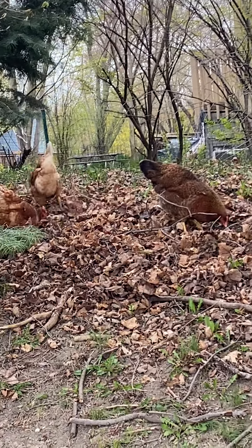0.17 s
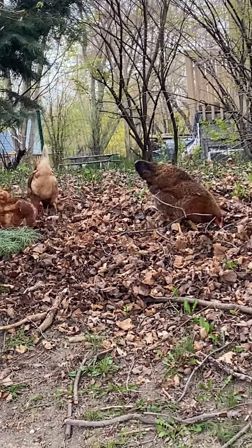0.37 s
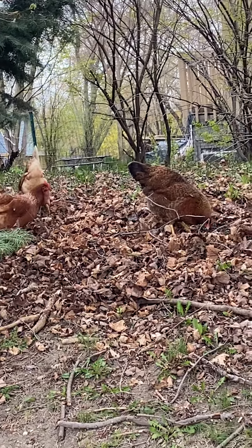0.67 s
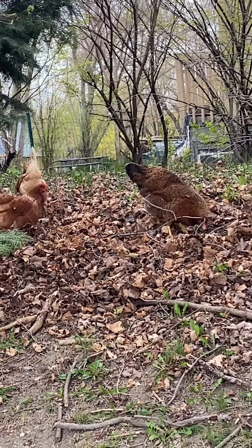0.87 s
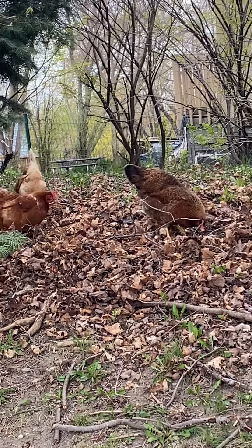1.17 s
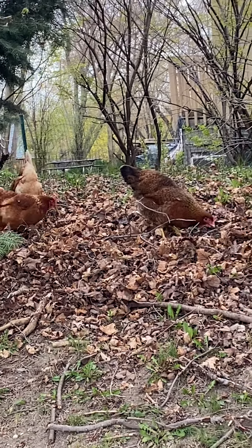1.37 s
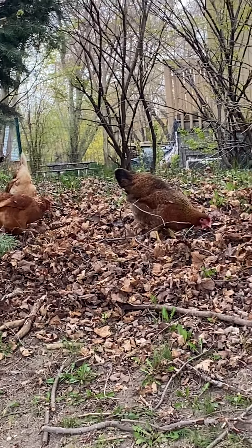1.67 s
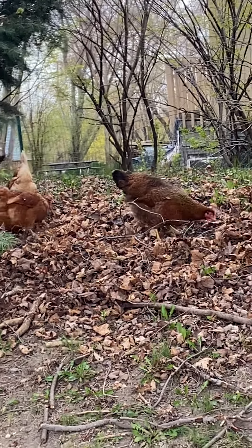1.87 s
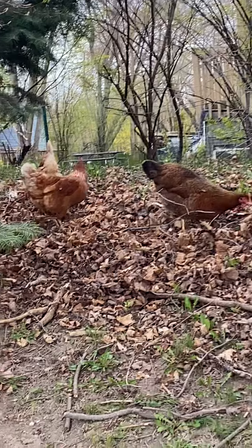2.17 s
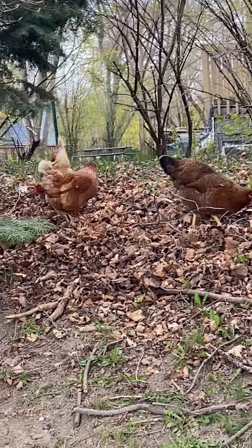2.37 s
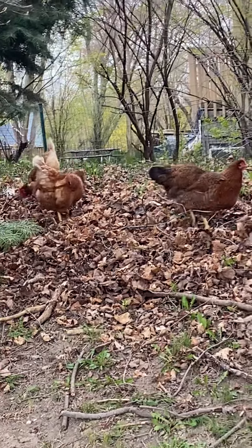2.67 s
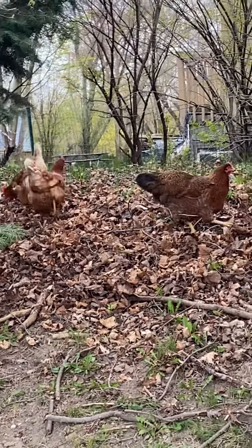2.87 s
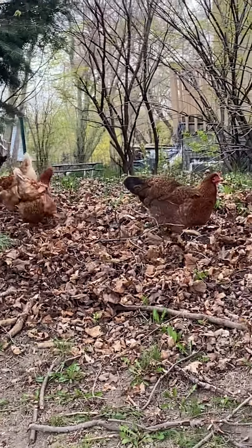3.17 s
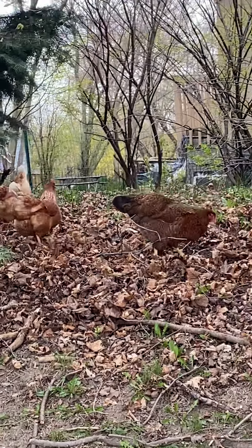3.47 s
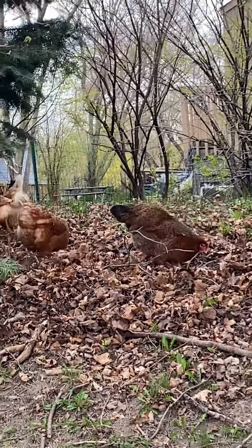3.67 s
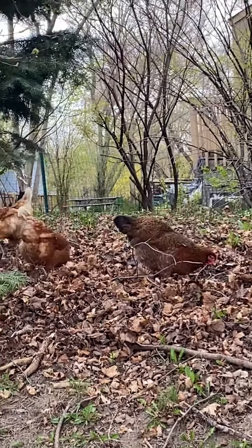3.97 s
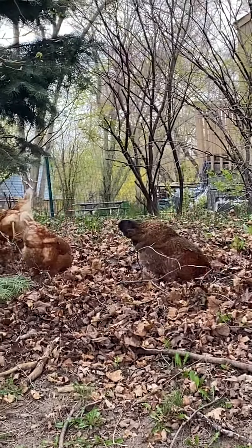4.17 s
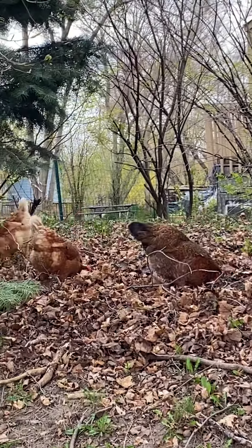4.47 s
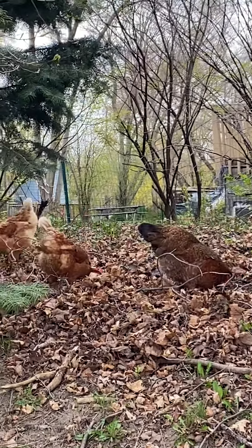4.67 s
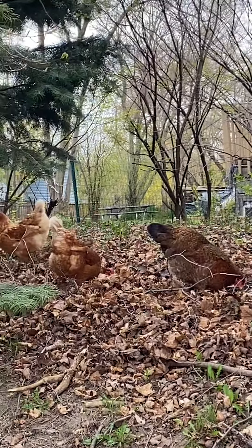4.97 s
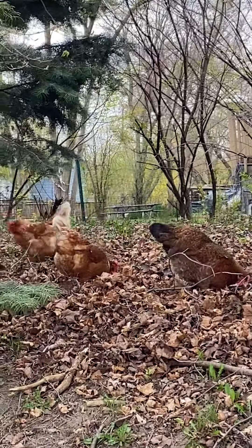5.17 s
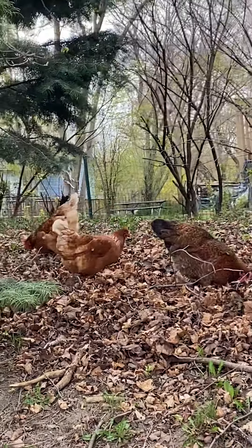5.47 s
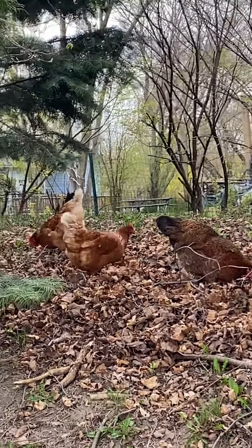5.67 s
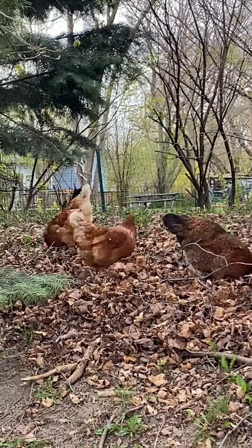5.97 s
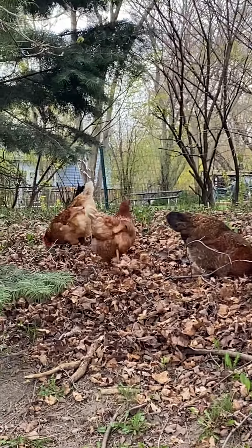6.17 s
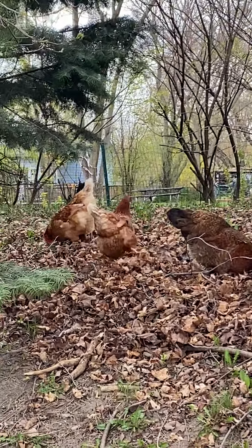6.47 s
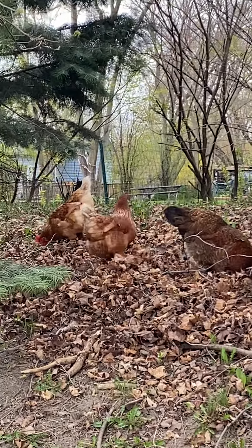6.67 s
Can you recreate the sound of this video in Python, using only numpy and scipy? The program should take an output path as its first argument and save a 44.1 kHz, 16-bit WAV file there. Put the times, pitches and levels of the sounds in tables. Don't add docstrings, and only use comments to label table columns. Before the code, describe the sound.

Brittle leaf litter rustles softly, then crunches under vigorous scratching, while a faraway road drones and a car approaches at the end.

```python
import sys
import numpy as np
from scipy import signal
from scipy.fft import rfft, irfft, next_fast_len
from scipy.io import wavfile
from scipy.ndimage import uniform_filter1d

SR = 44100
rng = np.random.default_rng(int(sys.argv[2]) if len(sys.argv) > 2 else 0)


def put_to_file(sound):
    columns = np.atleast_2d(sound).T
    safe = np.clip(columns, -1, 1)
    whole_steps = np.round(safe * 32767)
    wavfile.write(sys.argv[1], SR, whole_steps.astype(np.int16))


def volts_from_decibels(level):
    exponent = np.asarray(level, float) / 20
    return 10 ** exponent


N = 300982

# t/s, engine drone level/dB
LORRY_DRONE = [(0.0, -58.5), (0.42, -64.5), (0.62, -58), (1.19, -60.5), (2.39, -53.5), (2.62, -62),
               (4.65, -52), (5.28, -46), (5.58, -56), (6.0, -50.5), (6.08, -56), (6.51, -52.5), (6.67, -57),
               (6.82, -53.5)]
# t/s, level/dB
CAR_APPROACH = [
    (5.4, -69),
    (5.8, -64.5),
    (6.1, -59.5),
    (6.35, -55),
    (6.6, -55),
    (6.82, -52.5),
]


def evened(x):
    return x / np.sqrt(np.mean(x ** 2) + 1e-20)


def smooth(x, *widths, axis=-1):
    for width in widths:
        x = uniform_filter1d(x, size=width, axis=axis)
    return x


def read(points, hz):
    f, value = np.transpose(points)
    return np.interp(np.log(hz + 1), np.log(f + 1), value)


def level_curve(points):
    s, db = np.transpose(points)
    return np.interp(np.arange(N) / SR, s, db)


def coloured(x, points):
    size = next_fast_len(N)
    gain = volts_from_decibels(read(points, np.fft.rfftfreq(size, 1 / SR)))
    return irfft(rfft(x, size) * gain, size)[..., :N]


def crack(hz, t60):
    t = np.arange(900) / SR
    return np.sin(2 * np.pi * hz * t) * volts_from_decibels(-60 * t / t60) * (1 - np.exp(-t / .0001))


def strokes():
    # peak t/s, rise/s, fall/s, level/dB, crisp top re level/dB
    shuffles = [(0.0, 0.3, 0.4, -64, -4.5), (0.159, 0.099, 0.14, -57, -3.5),
                (0.379, 0.056, 0.063, -65.5, -6), (0.519, 0.29, 0.082, -69.5, -15),
                (0.686, 0.1, 0.028, -66.5, -6.5), (0.74, 0.024, 0.035, -63, -9.5),
                (0.868, 0.15, 0.069, -68.0, -7.5), (1.09, 0.3, 0.388, -73, -16),
                (1.249, 0.062, 0.074, -66.5, -9.5), (1.426, 0.081, 0.047, -66, -16),
                (1.518, 0.09, 0.13, -63.5, -10), (1.685, 0.05, 0.099, -62, -7),
                (1.838, 0.3, 0.022, -70.5, -8.5), (1.893, 0.13, 0.16, -65, -7.0),
                (2.166, 0.079, 0.351, -63.5, -4.5), (2.472, 0.16, 0.038, -62.5, -7.5),
                (2.639, 0.19, 0.13, -69.5, -11.5), (5.66, 0.28, 0.14, -67, -4),
                (5.69, 0.088, 0.31, -69, -8), (5.933, 0.121, 0.4, -68.5, -11),
                (6.179, 0.075, 0.29, -60.5, -11.5), (6.32, 0.011, 0.4, -63, -8.5)]
    # peak t/s, rise/s, fall/s, level/dB, crisp top re level/dB
    rakes = [(2.886, 0.1, 0.014, -58, -7.5), (2.932, 0.058, 0.025, -59, -4.5),
             (3.01, 0.051, 0.29, -52.5, -9.5), (3.225, 0.17, 0.054, -50, -9), (3.367, 0.11, 0.021, -56, -7),
             (3.461, 0.12, 0.16, -50, -10.5), (3.647, 0.079, 0.135, -53, -9), (3.736, 0.06, 0.14, -55, -12),
             (3.963, 0.11, 0.161, -50, -12), (4.059, 0.15, 0.14, -47, -6.5),
             (4.184, 0.015, 0.061, -58, -8.0), (4.347, 0.17, 0.071, -58.5, -7.5),
             (4.5, 0.25, 0.16, -57, -12.5), (4.59, 0.2, 0.078, -54.5, -8), (4.824, 0.029, 0.058, -54, -3.5),
             (4.876, 0.13, 0.098, -52.5, -7), (5.121, 0.17, 0.096, -56, -7.0),
             (5.242, 0.037, 0.061, -49, -11.5), (5.29, 0.073, 0.19, -51, -6),
             (6.437, 0.049, 0.083, -47, -12), (6.494, 0.028, 0.11, -52.5, -9),
             (6.678, 0.015, 0.399, -55, -18.5), (6.808, 0.23, 0.032, -50.5, -12)]
    s, rise, fall, db, crisp_db = np.transpose(shuffles + rakes)[..., None]
    t = np.arange(0, N, 100) / SR
    away = np.where(t < s, (s - t) / rise, (t - s) / fall)
    shape = volts_from_decibels(db - 12 * away ** 1.5)
    sums = [np.sqrt((g ** 2).sum(0)) for g in (shape, shape * volts_from_decibels(crisp_db))]
    return [np.interp(np.arange(N) / SR, t, g) for g in sums]


def leaf_cracks():
    per_s, cycles, clump_db = 9000, 4.3, 1.5
    struck = rng.random(N) < per_s / SR
    pitches = np.geomspace(700, 17000, num=32)
    kind = rng.integers(0, 32, N)
    swarm = np.zeros(N)
    for k, hz in enumerate(pitches):
        ring = evened(crack(hz, cycles / hz)) * np.sqrt(hz)
        swarm += signal.oaconvolve(struck * (kind == k), ring)[:N]
    clumps = evened(smooth(rng.standard_normal(N), 500, 300))
    return evened(swarm) * volts_from_decibels(clump_db * clumps)


def vein_ticks():
    per_s, t60_s = 400, 0.0016
    ticks = (rng.random(N) < per_s / SR) * volts_from_decibels(2.2 * np.minimum(rng.exponential(1, N), 4))
    burst = volts_from_decibels(-60 * np.arange(200) / SR / t60_s)
    return evened(signal.oaconvolve(ticks, burst)[:N] * rng.standard_normal(N))


def mottled(x, patchy_db):
    z = signal.stft(x, nperseg=256)[2]
    patches = smooth(smooth(rng.standard_normal(z.shape), 7, axis=0), 14, axis=1)
    return signal.istft(z * volts_from_decibels(patchy_db * evened(patches)), nperseg=256)[1][:N]


def rustle():
    # f/Hz, level/dB
    leaf_colour = [(300, -6.5), (700, -6), (1300, -7), (2000, -3), (2500, 0.5), (3400, -2), (5300, 0),
                   (7400, -0.5), (10000, -1), (13500, -4.5), (16000, -7)]
    level, crisp = strokes()
    swish = volts_from_decibels(-6) * rng.standard_normal(N)
    leaves = leaf_cracks() + swish + volts_from_decibels(-7) * vein_ticks()
    leaves = mottled(coloured(leaves, leaf_colour), patchy_db=1.0)
    body = coloured(leaves, [(5500, 0.5), (8500, -32)])
    top = leaves - body
    return level * volts_from_decibels(1.0) * evened(body) + crisp * volts_from_decibels(8.5) * evened(top)


def yard_air():
    # f/Hz, level/dB
    air_colour = [(1200, -14), (2000, -1), (5000, -22), (10000, -5), (16000, -12)]
    hiss = coloured(rng.standard_normal(N), [(300, -70)] + air_colour)
    return volts_from_decibels(-79) * evened(hiss)


def wash(points, patchy_db, size=1024):
    # f/Hz, coherence/0-1
    likeness = [(40, 1.), (160, .999), (300, .88), (600, .86), (900, .88), (1300, .82), (2500, .7)]
    frames, hz = 4 * N // size + 5, np.fft.rfftfreq(size, 1 / SR)
    a, b, c, d, patches = rng.standard_normal((frames, len(hz), 5)).T
    patches = evened(smooth(smooth(patches, 3, axis=0), 16, axis=1))
    same = np.clip(read(likeness, hz), -1, 1)[:, None]
    left = a + 1j * b
    right = same * left + np.sqrt(1 - same ** 2) * (c + 1j * d)
    z = np.array([left, right]) * volts_from_decibels(read(points, hz)[:, None] + patchy_db * patches)
    return evened(signal.istft(z, nperseg=size, noverlap=3 * size // 4)[1][:, :N])


def road_rumble():
    # f/Hz, level/dB
    rumble_colour = [(20, -51), (30, -26), (43, 8.5), (62, 11.5), (80, 12), (110, 10), (140, -2),
                     (200, -45), (400, -72)]
    # t/s, swell/dB
    bumps = [
        (.47, 2.5),
        (1.23, 6),
        (2.42, 3.4),
        (2.92, 3.4),
        (3.95, 1.4),
        (4.42, 3.2),
        (4.84, 2.3),
        (5.3, 2.2),
        (5.85, 2),
    ]
    bump_s, t = 0.06, np.arange(N) / SR
    bumps_db = sum(db * np.exp(-((t - s) / bump_s) ** 2) for s, db in bumps)
    drone_db = level_curve(LORRY_DRONE)
    rumble_db = -51 + 0.33 * (drone_db - drone_db.mean()) + bumps_db
    return volts_from_decibels(rumble_db) * wash(rumble_colour, 0.67, size=2048)


def engine_drone():
    # f/Hz, level/dB
    drone_colour = [(60, -72), (110, -48), (145, -16.5), (175, 2.5), (205, -5.5), (250, -14), (290, -35),
                    (400, -58)]
    return volts_from_decibels(level_curve(LORRY_DRONE)) * wash(drone_colour, 0.9, size=2048)


def tyre_roar():
    # f/Hz, level/dB
    tyre_colour = [(180, -10), (280, 8.5), (450, -0.5), (800, -1.5), (1100, -7), (1500, -6.5), (2600, -19),
                   (5000, -34), (8000, -78)]
    grow_db_per_s, t = 0.5, np.arange(N) / SR
    traffic = volts_from_decibels(-65 + grow_db_per_s * t)
    car = volts_from_decibels(level_curve(CAR_APPROACH) - 1.5)
    return np.hypot(traffic, car) * wash(tyre_colour, 1.92)


def snaps():
    # t/s, peak
    # level/dB, f/Hz
    leaf_and_twig_snaps = [(0.1513, -42, 10000), (0.3254, -57, 5140), (0.4504, -55, 3250), (0.4998, -57, 3400),
                           (0.5157, -52.5, 4050), (0.6844, -56, 5040), (0.7387, -50, 5080), (1.047, -55, 5140),
                           (1.076, -51.5, 4290), (1.1283, -53, 3170), (1.3936, -51, 3570), (1.4222, -47, 3930),
                           (1.682, -45.5, 4110), (1.714, -45, 3920), (1.7637, -49, 4120), (1.8203, -51, 8960),
                           (1.927, -49.5, 2590), (1.9987, -48, 11000), (2.1565, -46.5, 2560), (2.2402, -37, 10200),
                           (2.2524, -44, 5210), (2.8446, -45, 2570), (2.9245, -45, 5680), (2.9806, -39, 5350),
                           (3.3434, -39, 5400), (4.4835, -34, 3030), (4.5111, -37, 5110), (5.0858, -41, 4730),
                           (6.2372, -46, 4800), (6.3159, -38.5, 4980),
                           (2.1201, -49, 10200), (2.1874, -44, 9380), (2.385, -49, 11400), (2.4458, -46, 4250),
                   (2.795, -50, 2730), (3.0054, -43, 5400), (3.0424, -37, 3050), (3.4526, -39, 4010),
                   (3.6292, -38, 2510), (3.8272, -41, 2690), (3.8576, -49, 5380), (3.8781, -37, 3170),
                   (4.1834, -43, 3250), (4.3141, -45, 5620), (4.7935, -40.5, 4250), (4.9935, -43.5, 9070),
                   (5.2144, -40, 4690), (5.233, -39, 4600), (5.5313, -51.5, 2553), (6.3564, -42, 2530),
                   (6.4113, -40, 2950), (6.6338, -44, 3760), (6.6767, -42, 2950), (6.7294, -42, 5630)]
    tick_s, scatter_t60_s, gain_db = 0.011, 0.03, -6
    breaks = leaf_and_twig_snaps
    out, t = np.zeros(N + 900), np.arange(900) / SR
    for s, db, hz in breaks:
        noise = rng.standard_normal(900)
        tick = volts_from_decibels(-60 * (t / tick_s) ** 2) * noise
        ring = volts_from_decibels(-4) * crack(hz, 14 / hz)
        scatter = volts_from_decibels(-10 - 60 * t / scatter_t60_s) * noise
        out[round(s * SR):][:900] += volts_from_decibels(db + gain_db) * (tick + ring + scatter)
    return coloured(out[:N], [(600, -22), (2000, -4.5), (3000, -1), (5500, -0.5), (11000, -4.0), (16000, -9)])


def nearing_car():
    # f/Hz, level/dB
    car_colour = [(150, -50), (210, -24), (250, 13), (300, -24), (550, 3), (800, 3), (1200, -3.5),
                  (1600, -17), (2500, -51)]
    return volts_from_decibels(level_curve(CAR_APPROACH)) * wash(car_colour, 2.2)


def two_channels(x, flutter, drift):
    # f/Hz, phase/rad
    right_lag = [(0, 0.), (1900, .15), (2600, .56), (3400, .15), (4500, .5), (5000, .35), (5600, .95),
                 (7150, 3.14), (10500, 6.28), (13700, 9.42), (16400, 12.5)]
    hz, _, z = signal.stft(x, SR, nperseg=512)
    quick, slow = rng.standard_normal(z.shape[::-1] + (2,)).T
    quick = evened(smooth(quick, 3, axis=1))
    slow = evened(smooth(smooth(slow, 24, axis=0), 20, axis=1))
    reach = np.clip(hz / 7000, 0, 1)[:, None]
    lag = np.interp(hz, *np.transpose(right_lag))[:, None] + reach * (flutter * quick + drift * slow)
    pair = np.array([z * np.exp(.5j * lag), z * np.exp(-.5j * lag)])
    return signal.istft(pair, nperseg=512)[1][:, :N]


def scene():
    litter = two_channels(rustle() + yard_air(), flutter=0.48, drift=0.24)
    road = road_rumble() + engine_drone() + tyre_roar()
    breaks = two_channels(snaps(), flutter=0.1, drift=0.16)
    return litter + road + breaks + nearing_car()


def top_cut(x):
    return signal.sosfilt(signal.butter(12, 16040, fs=SR, output="sos"), x)


def record(dry):
    heard = coloured(dry, [(15, -42), (28, -16), (40, 0.5)])
    heard = coloured(heard, [(15800, 0), (16000, -70)])
    return top_cut(heard)


dry = scene()
out = record(dry)
put_to_file(out)
```